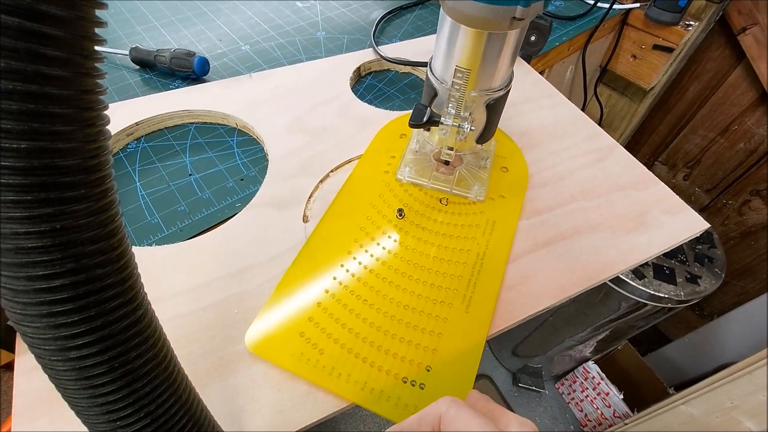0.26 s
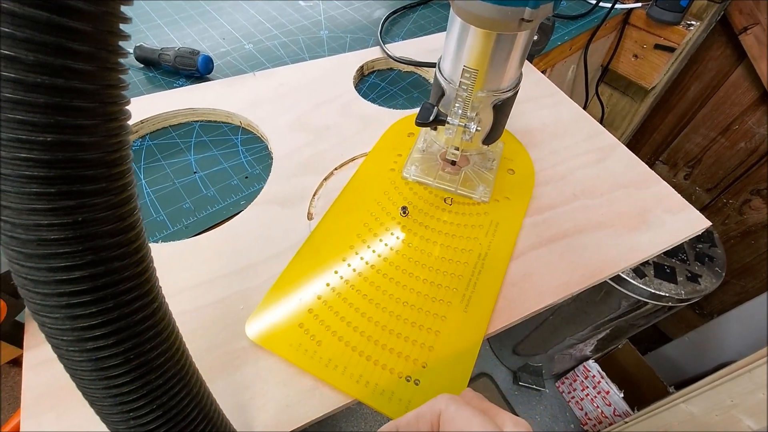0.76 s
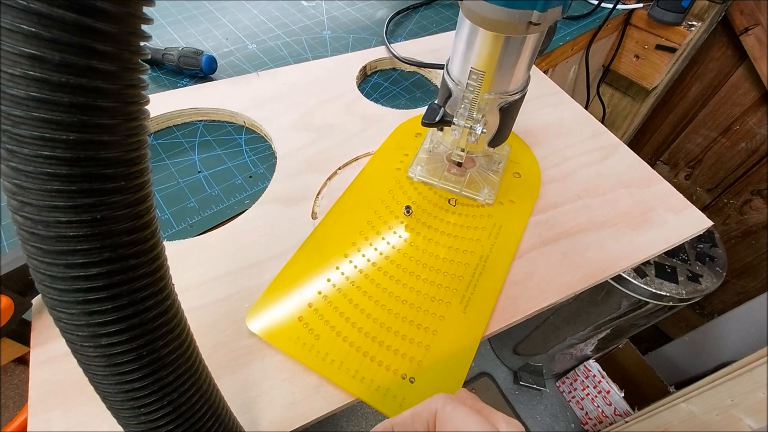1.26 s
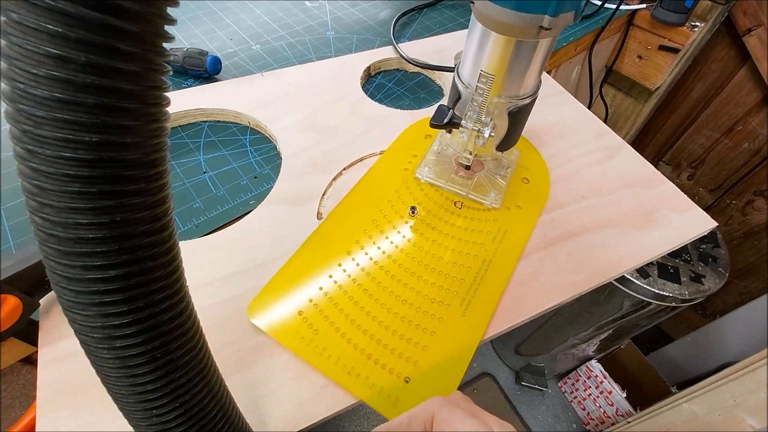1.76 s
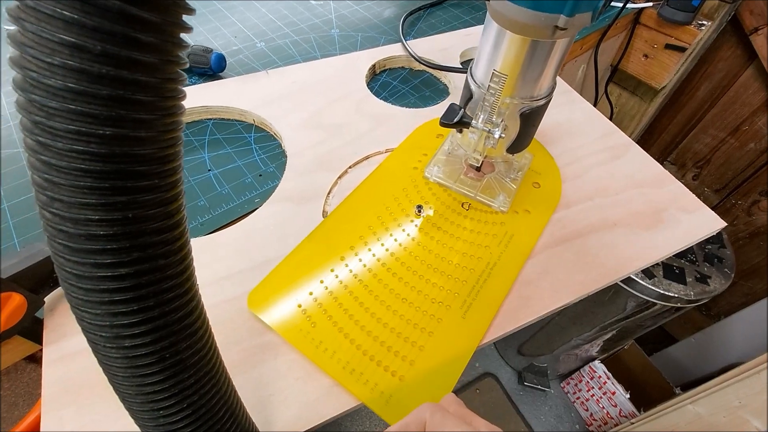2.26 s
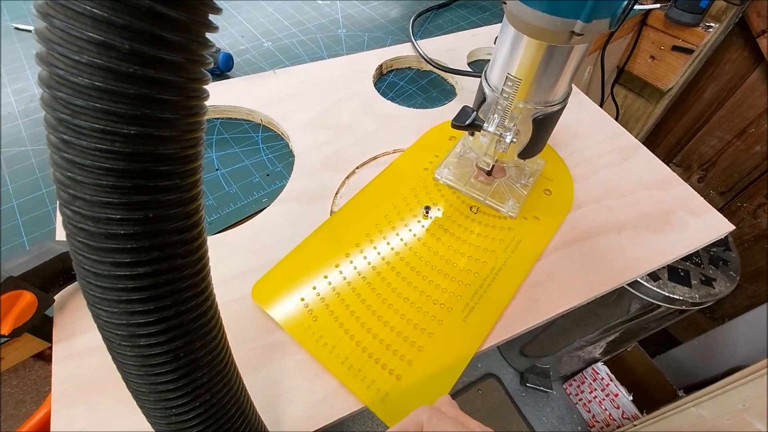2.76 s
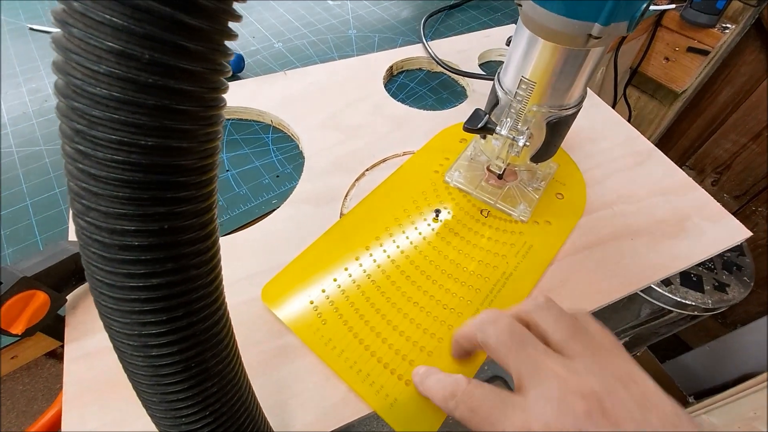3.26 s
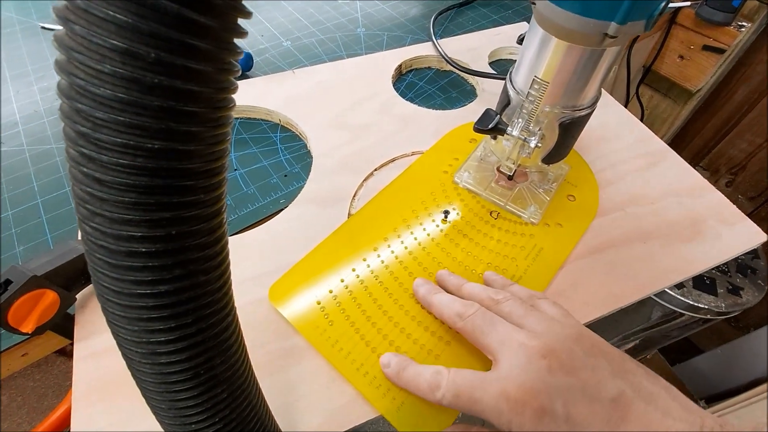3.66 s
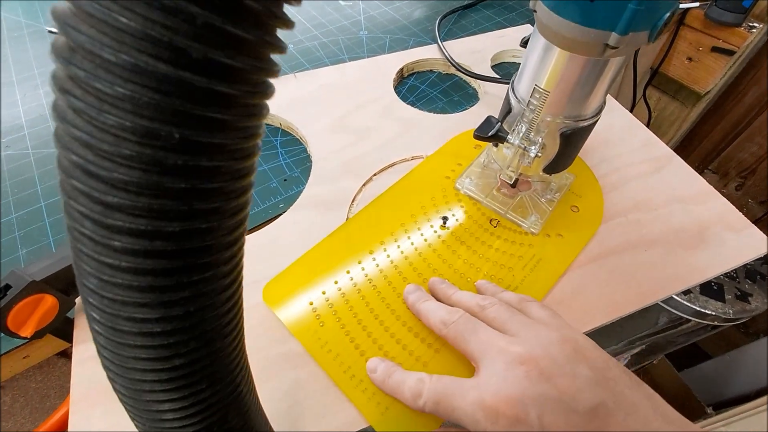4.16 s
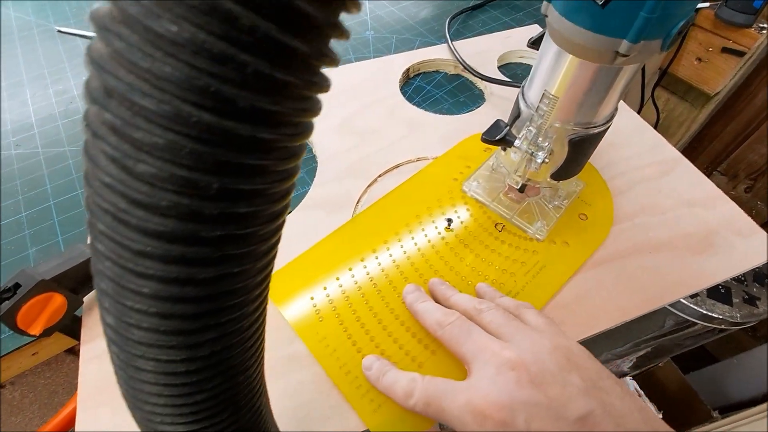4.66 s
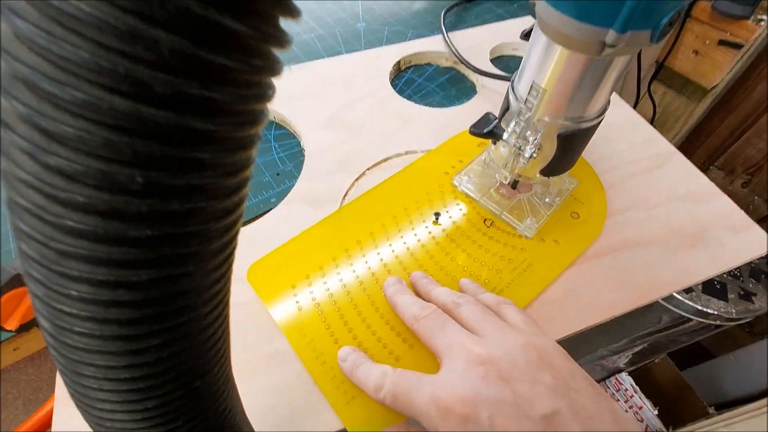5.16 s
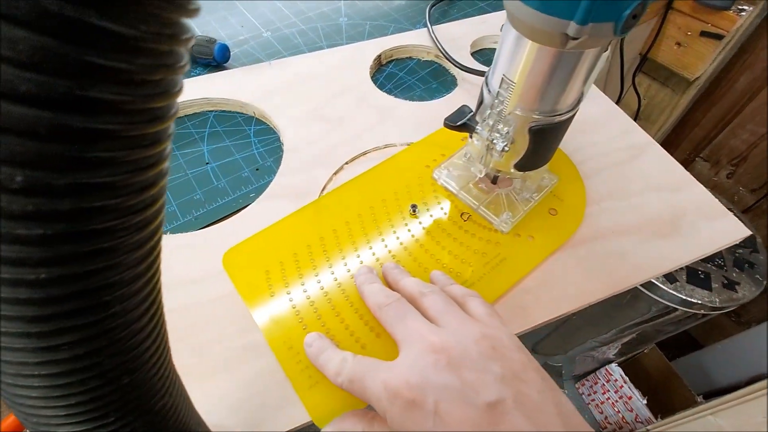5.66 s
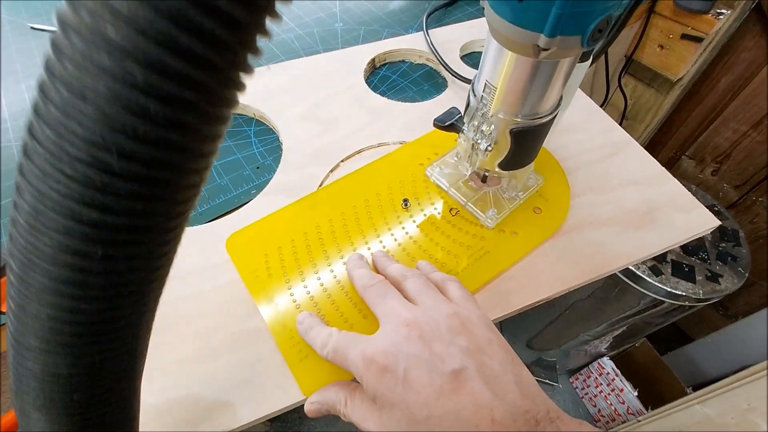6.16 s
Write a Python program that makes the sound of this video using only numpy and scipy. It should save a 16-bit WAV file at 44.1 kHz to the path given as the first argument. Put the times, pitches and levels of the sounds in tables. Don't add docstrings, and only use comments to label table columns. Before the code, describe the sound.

In a workshop, a hand-held trim router cuts plywood an arm's length from a stereo microphone. Its buzzing whine sinks in pitch under load with rough chatter, shudders briefly, then runs up smooth and higher as the cut pauses. It grazes the wood, tears in again with a spray of chips and settles lower. The nearer right side overloads with pops and rasps; faint extractor rush and mains buzz lie behind.

```python
import sys
import numpy as np
from scipy import signal
from scipy.fft import rfft, irfft, next_fast_len
from scipy.io import wavfile
from scipy.ndimage import uniform_filter1d, map_coordinates

SR = 44100
rng = np.random.default_rng(int(sys.argv[2]) if len(sys.argv) > 2 else 0)


def to_wav(sig):
    pcm = np.clip(np.atleast_2d(sig), -1, 1) * 32767
    pcm = np.round(pcm).astype(np.int16)
    wavfile.write(sys.argv[1], SR, pcm.T)


def natural_amplitude(level_db):
    exponent = np.asarray(level_db, float) / 20
    return 10 ** exponent


N = 282663
STEP = 64
SLOW = np.arange(0, N + STEP, STEP) / SR


def unit(x):
    return x / np.sqrt(np.mean(x ** 2) + 1e-20)


def curves(rows):
    s, *cols = np.transpose(rows)
    return [np.interp(SLOW, s, c) for c in cols]


def fine(control):
    return np.interp(np.arange(N) / SR, SLOW, control)


def wobble(rate):
    knots = rng.standard_normal(int(SLOW[-1] * 200) + 4)
    return map_coordinates(knots, [SLOW * rate])


def turns(hz):
    return 2 * np.pi * np.cumsum(fine(hz)) / SR


def coloured(points, source):
    m = next_fast_len(N + 8192)
    f, db = np.transpose(points)
    log_hz = np.log(np.fft.rfftfreq(m, 1 / SR) + 1)
    gain = natural_amplitude(np.interp(log_hz, np.log(f), db, left=-60))
    return unit(irfft(rfft(source, m) * gain, m)[:N])


# frequency [Hz], lag [half turns].
LATE = [(400, .08), (700, .7), (1600, .4), (2500, .55), (3100, .35), (4000, .55), (5500, .45), (11000, .7)]


def line(phase, hz, left_db, right_db, slow_db, fast_db):
    start = rng.uniform(0, 2 * np.pi)
    lag = np.pi * np.interp(hz, *np.transpose(LATE)) + rng.normal(0, .3) + .3 * wobble(1.5)
    sides = []
    for db, late in ((left_db, fine(lag)), (right_db, 0)):
        gain = natural_amplitude(db + slow_db * wobble(2.94) + fast_db * wobble(40))
        gain = gain * (1 + 0.084 * wobble(170))
        sides.append(np.sqrt(2) * fine(gain) * np.sin(phase + start - late))
    return np.array(sides)


# frequency [Hz], level [dB per Hz].
EXTRACTOR = [(200, -13), (600, -1.5), (1400, -8.5), (3000, -33)]


def hum():
    t = np.arange(N) / SR
    rush = np.array([coloured(EXTRACTOR, noise) for noise in rng.standard_normal((2, N))])
    return line(2 * np.pi * 100 * t, 100, -77, -61, 4.0, 1.7) + natural_amplitude(-46) * rush


# time [s], strength [0-1].
JUDDER = [
    (0, 0),
    (2.3, 0.1),
    (2.5, 0.8),
    (2.8, 0.9),
    (2.9, 0.1),
]


def judder():
    return curves(JUDDER)[0] * np.cos(2 * np.pi * 20.6 * (SLOW - 2.685))


def pop(times, dbs, swing, spike_s):
    peak_s = 0.0006
    t = np.arange(SR // 20) / SR
    spike = -np.exp(-.5 * ((t - peak_s) / spike_s) ** 2)
    onset = 1 - np.exp(-(t / 0.0017) ** 2)
    back = swing * natural_amplitude(-60 * t / 0.041) * np.sin(2 * np.pi * 75 * t) * onset
    housing = 0.16 * natural_amplitude(-60 * t / 0.064) * np.sin(2 * np.pi * 310 * (t - .001))
    kicks = np.bincount(np.round((times - peak_s) * SR).astype(int), natural_amplitude(dbs), N)[:N]
    return signal.fftconvolve(kicks, spike + back + housing)[:N]


# time [s], level over its limit [dB].
OVERLOAD = [(0, -4), (.17, -9.5), (.22, -0.5), (.8, 4.5), (1.2, 1.9), (1.3, -9.5), (1.37, 1.5), (2.0, 6.5),
            (2.8, -1.5), (2.92, -31), (4.06, -15), (4.14, -2), (4.4, 5), (4.5, -1), (4.55, -21),
            (5.4, -8.5), (5.9, -27), (6.41, -12)]
# time [s], peak [dB].
POPS = [(0.198, -8.5), (0.228, -10), (.322, -6), (.701, -11), (.958, -4), (1.086, -7), (1.195, -12),
        (1.371, -17), (1.659, -7), (1.716, -0.5), (1.846, -3), (2.244, -1.5), (2.29, -4), (2.764, -6.5),
        (4.129, -3.5), (4.188, -1.5), (4.243, -20), (4.397, -5), (4.477, -14), (5.014, -10.5), (5.137, -16),
        (5.336, -9), (5.382, -14), (5.761, -16), (5.8, -17), (5.898, -9), (5.957, -12), (5.987, -9),
        (6.04, -10), (6.272, -11)]
# time [s], peak [dB].
BUMPS = [
    (1.7, -29),
    (4.3, -32),
]


def overload(shaft, slip):
    at, beats = (np.flatnonzero(np.diff(np.floor(phase / (2 * np.pi))) > 0)[1:] for phase in (shaft, slip))
    drive_db = fine(curves(OVERLOAD)[0] + 1.05 * wobble(20) + 7 * judder())
    chance = rng.standard_normal((len(at), 3))
    luck = rng.standard_normal((len(beats), 3))

    margin_db = drive_db[at] - 5.0 + 4 * np.cos(slip[at]) + 5 * chance[:, 0]
    size_db = 0.24 * drive_db[at] - 17.5 + 3 * chance[:, 1] - 60 / (1 + np.exp(margin_db))
    small = pop(np.abs(at / SR + 0.00065 * chance[:, 2]), size_db, 1.0, 0.00025)

    margin_db = drive_db[beats] + 4 + 3 * luck[:, 0]
    beat_db = -13.5 + 4 * luck[:, 1] - 60 / (1 + np.exp(margin_db))
    beat_s = beats / SR + 0.00305 * luck[:, 2]
    clear_s, clear_db = np.transpose(POPS)
    sharp = pop(np.append(clear_s, beat_s), np.append(clear_db - 1, beat_db), 0.54, 0.000071)
    return np.array([pop(*np.transpose(BUMPS), .9, .0004), small + sharp])


# frequency [Hz], level [dB per Hz].
RASP = [(3000, -18), (7000, -11), (9000, -27), (12500, 0), (14000, -8), (16000, -8.5)]


def rasp(strain, shaft):
    return natural_amplitude(-13.0) * strain * (1.94 + np.cos(shaft)) * coloured(RASP, rng.standard_normal(N))


def turning_noise(angle, memory):
    spots = 128
    fresh = rng.standard_normal((2800, spots))
    kept = signal.lfilter([1], [1, -memory], fresh, axis=0).ravel()
    return np.interp(angle / (2 * np.pi) * spots, np.arange(kept.size), kept)


# frequency [Hz], level [dB per Hz].
AIR_LEFT = [(30, -46), (150, -43), (300, -25), (550, -14), (1000, -12.5), (1500, -3.5), (3000, 4.5),
            (4800, -5), (7500, -6.5), (9000, -25), (11300, 0.5), (13000, -13), (15500, -9.5)]
# frequency [Hz], level [dB per Hz].
AIR_RIGHT = [(30, -38), (150, -8), (300, 3.5), (550, -5.5), (1000, -1), (1500, 0.5), (3000, -0.5),
             (5500, -5), (7500, -9.5), (9000, -7), (11300, -2), (13000, -6.5), (15500, -10.5)]
# start [s], length [s], added air [dB].
TOUCHES = [
    (3.79, .045, 6),
    (4.2, .1, 3),
]


def air(shaft, slip, chatter_db):
    air_db = 2 + 0.24 * curves(OVERLOAD)[0]
    for start_s, hold_s, db in TOUCHES:
        air_db += db * (SLOW > start_s) * (SLOW < start_s + hold_s)
    puff = 1 + 0.55 * np.cos(shaft) + 0.069 * np.cos(slip) * fine(natural_amplitude(chatter_db + 10))
    swell = fine(natural_amplitude(air_db + 0.057 * chatter_db + 0.95 * wobble(11) + 3.26 * judder()))
    flute = shaft - slip / 8
    left = natural_amplitude(-35.5) * coloured(AIR_LEFT, turning_noise(flute, 0.76))
    right = natural_amplitude(-28.5) * coloured(AIR_RIGHT, turning_noise(flute, 0.44))
    return np.array([left, right]) * puff * swell


# centre [Hz], half width [Hz], left lift [dB], right lift [dB].
BODY = [(371.4, 8.9, 12.5, 7), (449, 12.95, -15, 11), (687.6, 16, 3.5, 12.5), (3185, 21.6, 3, -8),
        (2218, 19, 8, 12.5), (2421, 32, 0, 5), (2805, 48, -1.5, 5), (3103, 57, -1, 8.5),
        (3387, 36, -9, 6.5), (3583, 45, -2.5, 7), (3993, 57, 5, 15.5), (4250, 39, 3.5, 12.5),
        (719, 4.1, -3, -9), (5734, 170, -10, 10.5)]


def body_db(hz):
    centre, width, *dbs = np.transpose(BODY)
    closeness = 1 / (1 + ((hz - centre[:, None]) / width[:, None]) ** 2)
    return np.array(dbs) @ closeness - 3.5


# time [s], stage [0 first cut, 1 running free, 2 second cut].
STAGES = [
    (0, 0),
    (3.06, 0.12),
    (3.2, 1),
    (4.16, 1),
    (4.27, 2),
    (6.41, 4),
]


def staged(table, shaft_hz, shaft, slip_hz, slip, level_db):
    stage = curves(STAGES)[0]
    out = np.zeros((2, N))
    for order, *dbs in table:
        order = round(order)
        left, right = (np.interp(stage, np.arange(3), dbs[side::2]) + level_db for side in range(2))
        lift = body_db(order * shaft_hz - slip_hz)
        phase = order * shaft - slip
        slow_db, fast_db = .5 + order / 20, .6 + order / 12
        out += line(phase, order * shaft_hz, left + lift[0], right + lift[1], slow_db, fast_db)
    return out


# slips under the order [count], centre [Hz], spread [Hz],
# left level [dB], right level [dB].
OVERTONES = [(2, 5600, 1570, -50.5, -44), (2, 11300, 1200, -55, -57.5), (3, 5500, 1800, -59.5, -55),
             (3, 11200, 800, -78, -50), (4, 12200, 1830, -71, -48)]


def overtones(shaft_hz, shaft, slip, chatter_db):
    out = np.zeros((2, N))
    for slips, centre_hz, spread_hz, left_db, right_db in OVERTONES:
        near = round(centre_hz / 380)
        reach = int(np.ceil(spread_hz / 200))
        for order in range(max(near - reach, 1), near + reach + 1):
            hz = order * shaft_hz
            hump_db = 0.9 * chatter_db - 3.74 * ((hz - centre_hz) / spread_hz) ** 2
            phase = order * shaft - round(slips) * slip
            out += line(phase, hz, left_db + hump_db, right_db + hump_db, 3.3, 2.8)
    return out


# order [turns], then left and right level [dB]
CHATTER = [(5, -60, -42.5, -38, -34, -43, -50), (6, -39.5, -37.5, -30, -16.5, -37.5, -34.5),
           (7, -34.4, -29, -52, -30.5, -49, -30.5), (8, -32.5, -23.5, -48, -29.5, -35, -26),
           (9, -34.5, -35, -33, -43, -35, -50), (10, -35, -33.5, -48, -47, -35.5, -37),
           (11, -39, -39, -43, -39, -32.5, -37), (12, -37.5, -47.4, -32, -36, -51, -43),
           (13, -36.5, -47, -52, -36.5, -56, -35), (14, -33.5, -39, -85, -42, -30, -38.3),
           (15, -39, -50, -75.0, -56, -40, -40), (16, -55, -48, -75.0, -62, -75.0, -45)]


def chatter_lines(shaft_hz, shaft, slip_hz, slip, chatter_db, cage, depth):
    lines = staged(CHATTER, shaft_hz, shaft, slip_hz, slip, chatter_db)
    return lines * (1 + depth * np.cos(cage)) * fine(natural_amplitude(1.94 * judder()))


# order [turns], then left and right level [dB]
SHAFT = [(1.0005, -37, -31, -37, -37, -33.5, -35), (2.001, -38, -38, -49, -46.5, -67, -39),
         (2.998, -77, -42, -44.5, -46.5, -85, -46), (4, -43, -35, -39, -43.5, -37.5, -45),
         (4.995, -49, -47.5, -44.5, -39, -50, -51), (6, -46, -46, -49, -31, -41, -38.1),
         (6.99, -47.1, -43, -63.7, -54, -45, -35), (8.005, -51, -40, -75.0, -54, -39, -57),
         (9.01, -45, -41, -59, -83, -60, -67), (12, -62, -70, -63, -48, -69.9, -44),
         (24, -75.0, -75.0, -75.0, -54, -61, -75.0), (25, -73, -73, -75.0, -48, -55, -59)]


def shaft_whine(shaft_hz, shaft):
    return staged(SHAFT, shaft_hz, shaft, 0, 0, 3.5)


# time [s], shaft speed [Hz].
SPEED = [(0, 370), (.55, 360.4), (.9, 351.9), (1.3, 359.2), (1.58, 358.8), (1.85, 347.3), (2.38, 338.4),
         (2.55, 346.2), (2.9, 361), (3.27, 424.8), (3.55, 455.5), (3.75, 461.2), (4.02, 449), (4.27, 412.5),
         (4.48, 397.1), (4.72, 414.3), (5.6, 401), (6.41, 395.2)]
# time [s], chatter slip under an order [Hz], bite [dB].
CUT = [(0, 33, 6), (1.7, 33, 5), (2.85, 38, 3), (2.94, 3, 0), (3.08, 5, 0), (3.22, 0.1, -19),
       (3.5, -3, -48), (3.64, 1.3, -10), (3.8, 12, 0.5), (3.92, 22, -6), (4.0, 24, 0.1), (4.2, 33, 5),
       (4.25, 155, 3), (4.48, 75, 2), (4.6, 32, -3), (4.75, 99, 1.3), (5.84, 67, 4), (6.41, 62, 1.5)]
# time [s], rate [Hz], depth [0-1].
CAGE = [
    (0, 33, 0.01),
    (4.6, 33.1, 0.09),
    (6.0, 33.05, 0.29),
    (6.41, 33, 0.06),
]


def router():
    shaft_hz = uniform_filter1d(curves(SPEED)[0], 60)
    slip_hz, chatter_db = curves(CUT)
    shaft = turns(shaft_hz + 0.412 * wobble(30))
    cage_hz, depth = curves(CAGE)
    cage, depth = turns(cage_hz + 3 * wobble(12)), fine(depth)
    slip = turns(slip_hz + 3 * wobble(45)) + 2.0 * depth * np.sin(cage)
    tool = shaft_whine(shaft_hz, shaft)
    tool += chatter_lines(shaft_hz, shaft, slip_hz, slip, chatter_db, cage, depth)
    tool += overtones(shaft_hz, shaft, slip, chatter_db)
    tool += air(shaft, slip, chatter_db)
    return tool, shaft, slip


def scene():
    tool, shaft, slip = router()
    pops = overload(shaft, slip)
    strain = np.abs(uniform_filter1d(np.abs(pops), 150, axis=1))
    return tool / (1 + 3 * strain) + pops + rasp(strain, shaft) + hum()


def low_pass(x):
    return signal.sosfilt(signal.butter(12, 16780, fs=SR, output="sos"), x)


def record(dry):
    soft = dry / (1 + np.abs(dry / .6) ** 4) ** (1 / 4)
    hz = np.fft.rfftfreq(N, 1 / SR)
    low_cut = hz ** 2 / (hz ** 2 + 38 ** 2)
    band = (hz < np.array([[15300], [15830]])) * low_cut
    return low_pass(irfft(rfft(soft) * band, N))


dry = scene()
out = record(dry)
to_wav(out)
```